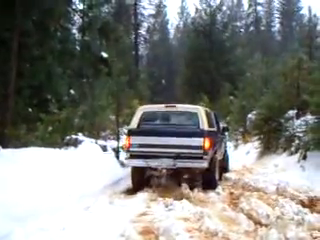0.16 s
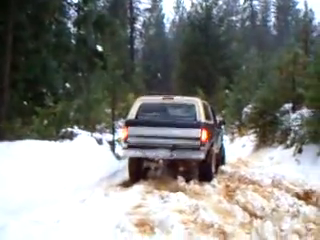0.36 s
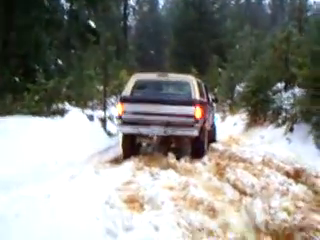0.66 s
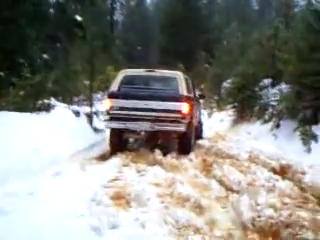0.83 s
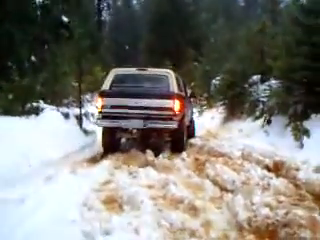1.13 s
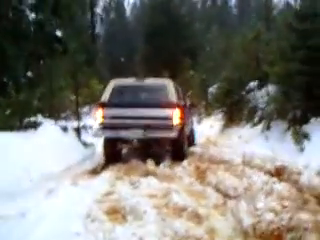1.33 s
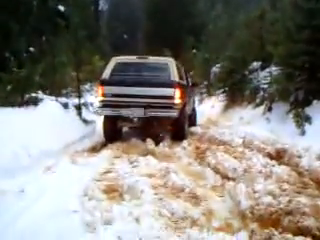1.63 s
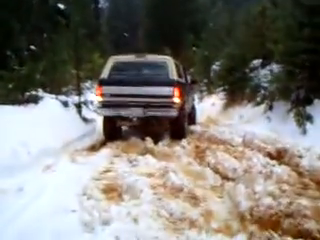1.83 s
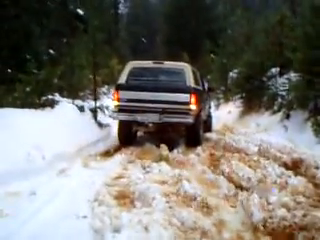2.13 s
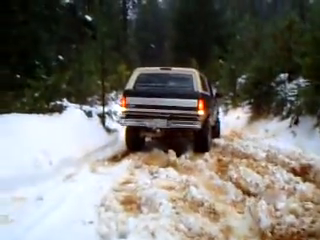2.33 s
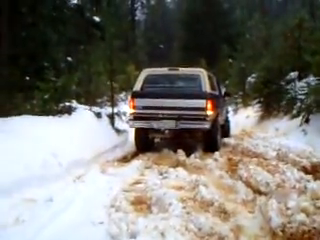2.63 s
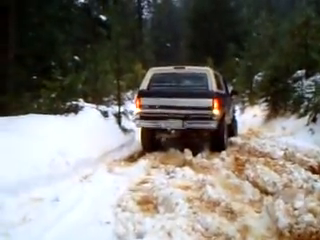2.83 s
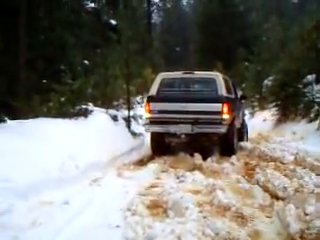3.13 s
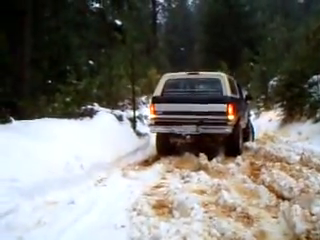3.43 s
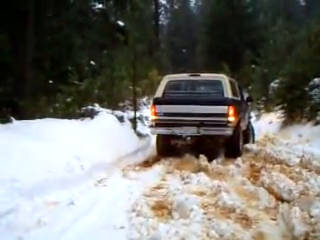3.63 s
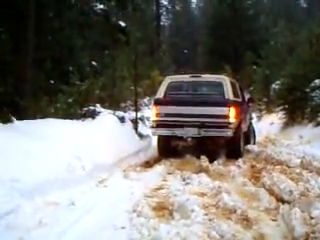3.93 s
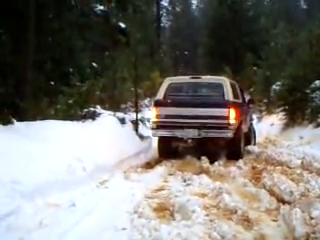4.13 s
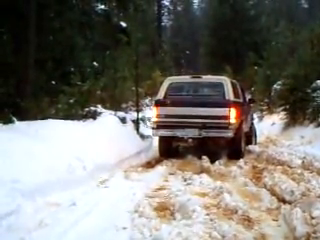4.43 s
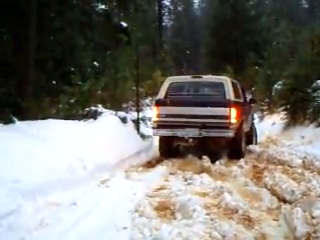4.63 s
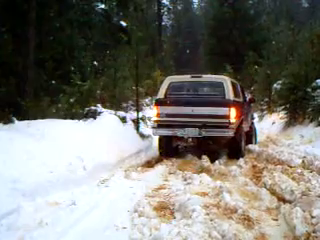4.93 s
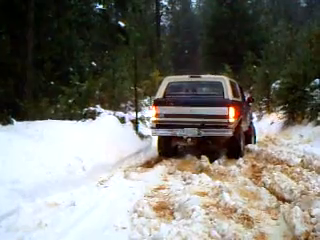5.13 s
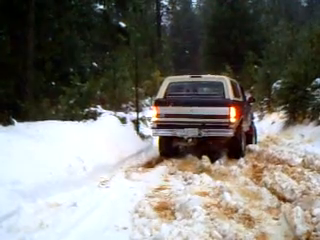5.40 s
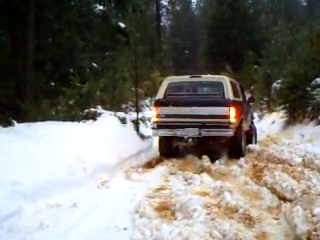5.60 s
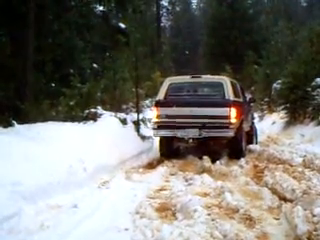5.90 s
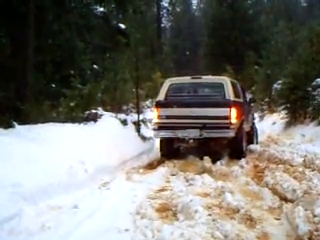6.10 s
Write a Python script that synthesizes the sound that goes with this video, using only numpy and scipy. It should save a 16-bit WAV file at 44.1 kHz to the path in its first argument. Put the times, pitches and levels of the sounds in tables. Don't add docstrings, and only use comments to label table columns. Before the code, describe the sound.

A big truck engine idles lumpily in snow, a twig snaps, ice ticks and snow crunches, then one roaring rev rises and falls back.

```python
import sys
import numpy as np
from scipy import signal
from scipy.fft import rfft, irfft
from scipy.io import wavfile
from scipy.ndimage import uniform_filter1d

SR = 44100
rng = np.random.default_rng(int(sys.argv[2]) if len(sys.argv) > 2 else 0)


def rack_gain(trim_db):
    fader = np.asarray(trim_db, float)
    return 10 ** (fader / 20)


def wav_record(signal):
    frames = np.transpose(np.atleast_2d(signal))
    bounded = np.clip(frames, -1, 1)
    quanta = np.round(bounded * 32767).astype(np.int16)
    wavfile.write(sys.argv[1], SR, quanta)


N = 276066
T = np.arange(N) / SR
HZ = np.maximum(np.fft.rfftfreq(2 * N, 1 / SR), 1)

# time [s], rate [Hz].
SPEED_HZ = [(0, 61.4), (.25, 43), (.5, 36), (1.12, 51.5), (1.82, 45.2), (2.1, 49.5), (2.35, 65.5),
            (2.62, 84.5), (2.85, 109), (3.14, 129.5), (3.45, 121.5), (3.75, 141), (4.4, 90), (4.7, 56),
            (4.88, 43), (5.08, 40.8), (5.65, 47.2), (6.26, 45)]
# time [s], firing line [dB], bank imbalance [dB], gas flow [dB].
ENGINE_DB = [(0, -40.5, 3, -53), (.45, -48, 4.5, -59.5), (.8, -35.5, 1, -56.5), (1.1, -35.5, 0, -54.5),
             (2.1, -37, 1.5, -55.5), (2.28, -27, -3.5, -55), (2.43, -28.5, 3.5, -52.5),
             (2.56, -29.5, 7.5, -46.5), (2.72, -18.5, -3, -42.5), (3.04, -16.5, -8, -40.5),
             (3.8, -17, -5.5, -41), (4.05, -21, -2.5, -45.5), (4.32, -35.5, 11.5, -47.5),
             (4.58, -39, 10.5, -52), (4.68, -42.5, 4, -58.5), (5.1, -39.5, 1.5, -60.5),
             (5.44, -35.5, 1.5, -60.5), (6.26, -36, 0, -61.5)]
# frequency [Hz], gain [dB].
PIPE_DB = [(20, -14), (45, 0), (84, -3), (97, -6.5), (125, 3), (148, 5.5), (168, -7), (190, -16),
           (250, -33), (400, -44), (900, -70)]
# frequency [Hz], gain [dB].
BANKS_DB = [(15, -36), (30, -26), (45, -22), (60, -15), (78, -10), (100, -5), (120, 0), (137, -2),
            (152, -8), (170, -15), (200, -23), (300, -37), (900, -70)]
EVEN_LAG_RAD = (0.085, 1.84, 0.035, 1, 0.27, 0.87, 0.23)
UNEVEN_DB = [
    (-15, -15, -12, -12, 1, -11, -4),
    (-11, -7, -1, -6, -1, -7, -11),
    (-6, -14, -.5, -4, 2, -12, -16),
    (-10, -6, -9, -8, -12, -10, -13),
]
UNEVEN_PHASE_RAD = (1.48, 1.88, 2.5, -1.07, -1, 3.5, 0.2)
# speed change [Hz/s], tilt [dB/octave].
PULL_TILT_DB = [(-83, 5), (-20, 0.35), (28, -0.67), (70, -20.5)]
# start [s], engine-bay lift [dB], roar lift [dB].
GULPS_DB = [
    (2.44, 3.5, 7),
    (2.69, 2.5, 2.5),
    (2.88, 1.5, 2),
    (2.96, 2, 2),
    (3.06, 1.5, -1),
    (3.3, -1, 3.5),
    (3.63, 3.5, 1),
    (4.15, 0.5, 1.5),
]
# frequency [Hz], density [dB/Hz].
ROAR_SPECTRUM_DB = [(120, -30), (200, 2.5), (338, -10), (455, -5), (542, -3.5), (624, -9), (779, -8.5),
                    (892, -17), (1000, -15.5), (1300, -31), (2200, -120)]
# frequency [Hz], density [dB/Hz].
CLATTER_SPECTRUM_DB = [(530, -50.5), (900, -11), (1210, 1.5), (1460, -4.5), (1810, 1), (2710, -3.5),
                       (2930, -6.5), (3690, -10.5), (4200, -19.5), (5460, -43), (9240, -120)]
# frequency [Hz], density [dB/Hz].
FAN_SPECTRUM_DB = [(2350, -15), (4000, 2.5), (4920, 7), (7260, 5), (9200, -5.5), (11300, -3), (11900, -8),
                   (13000, -28)]
# firing rate [Hz], level [dB].
FAN_LAW_DB = [(40, -65), (53, -64.5), (64, -60), (72, -54.5), (95, -50), (125, -47)]
# frequency [Hz], density [dB/Hz].
HUSH_SPECTRUM_DB = [(8, -6.5), (25, -4), (45, -5), (150, -5.5), (300, 2.5), (550, -1), (900, -9.5),
                    (2000, -16), (3200, -15), (7000, -20.5), (10400, -17), (13000, -31)]
# start [s], length [s], start pitch [Hz], end pitch [Hz], level [dB].
WHINES = [
    (.45, .4, 1237, 1237, -66),
    (5.1, 1.05, 1237, 1236, -69),
    (4.68, .22, 5420, 5300, -72),
    (5.75, .6, 4950, 4900, -77),
    (5.6, .22, 4170, 4180, -75),
]
# frequency [Hz], level [dB], t60 [s].
TWIG_MODES = [(1250, -8, .024), (1850, -1, .022), (2800, -2.5, .015), (3800, 3, .004), (5300, -9, .009),
              (8000, -9, .005), (10500, -13, .004)]
# start [s], peak [dB], ring [Hz], t60 [s].
ICE_TICKS = [
    (1.2341, -38, 1750, 0.012),
    (1.2618, -36, 1850, 0.012),
    (1.4775, -35, 2530, 0.021),
    (1.5085, -32, 1220, 0.022),
    (1.6095, -42, 1080, 0.012),
    (1.6507, -35, 1210, 0.014),
    (1.695, -33, 1740, 0.0071),
    (1.819, -37, 1040, 0.011),
    (2.373, -36, 2360, 0.018),
]
# start [s], peak [dB], ring [Hz], t60 [s].
BODY_KNOCKS = [
    (1.3322, -23, 345, .038),
    (1.3338, -28, 580, .016),
    (4.928, -37, 640, .03),
]
# start [s], length [s], level [dB], kind.
SLIPS = [(0.899, 0.14, -52.5, "slide"), (1.7, 0.15, -52.5, "slide"), (1.865, .04, -47, "thud"),
         (.7895, .005, -35, "crack"), (1.39, 0.056, -57, "patter"), (1.67, .03, -55, "patter"),
         (1.045, 0.066, -49, "crunch"), (1.1, 0.31, -53, "crunch"), (1.474, 0.1, -51, "patter"),
         (1.332, 0.037, -47.5, "burst"), (6.24, .04, -65.5, "burst"), (4.883, 0.079, -55.5, "rattle"),
         (5.16, .05, -55.5, "rattle"), (5.27, .05, -58, "rattle"), (5.415, .045, -63, "rattle")]
SLIP_BANDS = {"slide": [(3870, 1900, 0, 0.93), (1160, 1250, -0.5, 1), (9200, 3400, -7.5, 0.95)],
              "crunch": [(1850, 920, 0.5, 1), (2020, 4600, -5, 1)], "burst": [(2800, 5200, -2.5, 1),
              (1100, 1100, 2, 1)], "patter": [(2000, 1800, 0, 0.96), (5200, 5000, -7.5, 1)],
              "crack": [(2900, 2600, -1.5, 0.89)], "thud": [(520, 360, 0, 0.91)],
              "rattle": [(1480, 1700, 1, 1), (6000, 5100, -4.5, 0.43), (3840, 400, -6, 0.46)]}


def on_hz(table, hz):
    return np.interp(np.log(hz), np.log([row[0] for row in table]), [row[1] for row in table])


def colour(x, table):
    cep = irfft(on_hz(table, HZ) * np.log(10) / 20)
    cep[1:N] *= 2
    cep[N + 1:] = 0
    return irfft(rfft(x, 2 * N) * np.exp(rfft(cep)))[:N]


def unit(x):
    return x / np.sqrt(np.mean(x ** 2))


def noise(spectrum_db, swell=1):
    return unit(colour(rng.standard_normal(N) * swell, spectrum_db))


def walk(rate_hz):
    hold = int(SR / rate_hz)
    steps = np.repeat(rng.standard_normal(N // hold + 1), hold)
    slewed = uniform_filter1d(uniform_filter1d(steps, hold), hold)
    return unit(slewed[:N])


def ring(s, db, hz, t60_s):
    t = np.maximum(T - s, 0)
    decay = np.exp(-np.log(1000) * t / t60_s)
    return rack_gain(db) * np.minimum(t * hz, 1) * np.sin(2 * np.pi * hz * t) * decay


def speed():
    return uniform_filter1d(np.interp(T, *np.transpose(SPEED_HZ)), size=5500)


def engine_cycle(hz, wobble_firings=.015):
    firings = np.cumsum(hz) / SR + wobble_firings * walk(9)
    return 2 * np.pi * firings / 8


def high_speed(hz):
    return np.clip((hz - 112) / 12, 0, 1)


def overtone_tilt(hz):
    change_hz_s = uniform_filter1d(np.gradient(hz) * SR, size=4410)
    pull_db = np.interp(change_hz_s, *np.transpose(PULL_TILT_DB))
    return pull_db * np.minimum(hz / 84.5, 1) ** 2 - 4 * high_speed(hz)


def pipe_beat(hz, tilt_db, beat_hz=1.71, null_s=2.98, depth=0.78):
    beating = depth * np.clip((hz - 98) / 15, 0, 1) * np.clip(1 - tilt_db / 4, 0, 1)
    return 1 - beating + beating * 1.2 * np.abs(np.sin(2 * np.pi * beat_hz * (T - null_s)))


def uneven_banks(cycle, hz, tilt_db, overrun_cut=0.95):
    beat = pipe_beat(hz, tilt_db)
    uneven = 0
    for k in range(1, 57):
        if k % 8 == 0:
            continue
        db = UNEVEN_DB[min(k // 8, 3)][k % 8 - 1] + 1.2 * walk(4)
        if k < 8:
            db = db - overrun_cut * np.maximum(tilt_db, 0)
        line = rack_gain(db) * np.cos(k * cycle + UNEVEN_PHASE_RAD[k % 8 - 1])
        uneven = uneven + (line * beat if k == 5 else line)
    return uneven


def burn_scatter(cycle, hz):
    firing = np.floor(cycle * 8 / (2 * np.pi)).astype(int)
    strength = rng.standard_normal(N // 100)[firing]
    return np.diff(firing, prepend=firing[0]) * strength * SR / hz * 2


def exhaust(cycle, hz, scatter_db=-17.):
    s, line_db, lump_db, _ = np.transpose(ENGINE_DB)
    line_db, lump_db = np.interp(T, s, line_db), np.interp(T, s, lump_db)
    tilt_db = overtone_tilt(hz)
    even = 0
    for multiple in range(1, 8):
        tone = np.cos(8 * multiple * cycle - EVEN_LAG_RAD[multiple - 1])
        even = even + rack_gain(tilt_db * np.log2(multiple)) * tone
    blow = np.sqrt(2) * rack_gain(line_db - on_hz(PIPE_DB, hz)) * even
    pulses = uneven_banks(cycle, hz, tilt_db) + rack_gain(scatter_db) * burn_scatter(cycle, hz)
    lumps = np.sqrt(2) * rack_gain(line_db + lump_db) * pulses
    return colour(blow, PIPE_DB) + colour(lumps, BANKS_DB)


def body_shudder(hz, shake_hz=21, shake_db=-41, off_db=-30):
    level = rack_gain(shake_db + off_db * (1 - high_speed(hz)))
    return level * np.sin(2 * np.pi * shake_hz * T + .4 * walk(4))


def gas_flow():
    s, _, _, flow_db = np.transpose(ENGINE_DB)
    return np.interp(T, s, flow_db)


def gulps(rise_s=0.018, fall_s=.12):
    start_s, bay_db, roar_db = np.transpose(GULPS_DB)
    since = np.maximum(T - start_s[:, None], 0)
    shape = np.minimum(since / rise_s, 1) * np.exp(-since / fall_s)
    return bay_db @ shape, roar_db @ shape


def gas_roar(cycle, lift_db, puff=0.31):
    roar_db = -44.5 + 0.75 * (gas_flow() + 49.5) + lift_db
    puffs = 1 + puff * np.cos(8 * cycle)
    return noise(ROAR_SPECTRUM_DB, puffs) * rack_gain(roar_db + 1.2 * walk(24.73))


def engine_bay(hz, lift_db, fan_lag_s=0.053):
    flutter = walk(16)
    clatter_db = gas_flow() + lift_db + 1.0 * flutter + 0.73 * walk(40)
    fan_hz = np.interp(T - fan_lag_s, T, hz)
    fan_db = on_hz(FAN_LAW_DB, fan_hz) + lift_db * 1.05 + 1.03 * flutter
    return noise(CLATTER_SPECTRUM_DB) * rack_gain(clatter_db) + noise(FAN_SPECTRUM_DB) * rack_gain(fan_db)


def forest_hush(level_db=-56):
    return noise(HUSH_SPECTRUM_DB) * rack_gain(level_db + 0.39 * walk(6.23))


def belt_whine(fade_db_s=160):
    out = np.zeros(N)
    for s, length_s, start_hz, end_hz, db in WHINES:
        pitch_hz = np.interp(T, [s, s + length_s], [start_hz, end_hz]) + 1.24 * walk(5)
        turns = np.cumsum(pitch_hz) / SR
        outside_s = np.maximum(np.maximum(s - T, T - s - length_s), 0)
        level = rack_gain(db - fade_db_s * outside_s + 1.5 * walk(2.62))
        out += np.sqrt(2) * level * np.sin(2 * np.pi * turns)
    return out


def twig_snap(start_s=.7894, peak_db=-23.5, again_s=.0024):
    out = np.zeros(N)
    for hz, mode_db, t60_s in TWIG_MODES:
        out += ring(start_s, peak_db + mode_db, hz, t60_s)
        out += ring(start_s + again_s, peak_db - 4 - hz / 1000 + mode_db, hz, t60_s)
    return out


def snow_slips(grain_db=2.2):
    out = np.zeros(N)
    for s, length_s, db, kind in SLIPS:
        for hz, width_hz, band_db, share in SLIP_BANDS[kind]:
            grains = rng.standard_normal(N) * rack_gain(grain_db * walk(300))
            edges_hz = [max(hz - width_hz / 2, 200), hz + width_hz / 2]
            sos = signal.butter(2, edges_hz, "bandpass", fs=SR, output="sos")
            band = unit(signal.sosfilt(sos, grains))
            begin_s = s + length_s * (1 - share) / 4
            place = np.clip((T - begin_s) / (length_s * share), 0, 1)
            out += rack_gain(db + band_db) * band * np.sin(np.pi * place ** .7) ** .5
    return out


def ticks_and_knocks():
    out = np.zeros(N)
    for strike in ICE_TICKS + BODY_KNOCKS:
        out += ring(*strike)
    return out


def scene():
    hz = speed()
    cycle = engine_cycle(hz)
    bay_lift_db, roar_lift_db = gulps()
    truck = exhaust(cycle, hz) + body_shudder(hz)
    truck = truck + gas_roar(cycle, roar_lift_db) + engine_bay(hz, bay_lift_db) + belt_whine()
    ground = twig_snap() + snow_slips() + ticks_and_knocks()
    return (truck + forest_hush() + ground)[None]


def top_cut(x):
    return signal.sosfilt(signal.butter(12, 13180, fs=SR, output="sos"), x)


def record(dry):
    return top_cut(dry)


dry = scene()
out = record(dry)
wav_record(out)
```